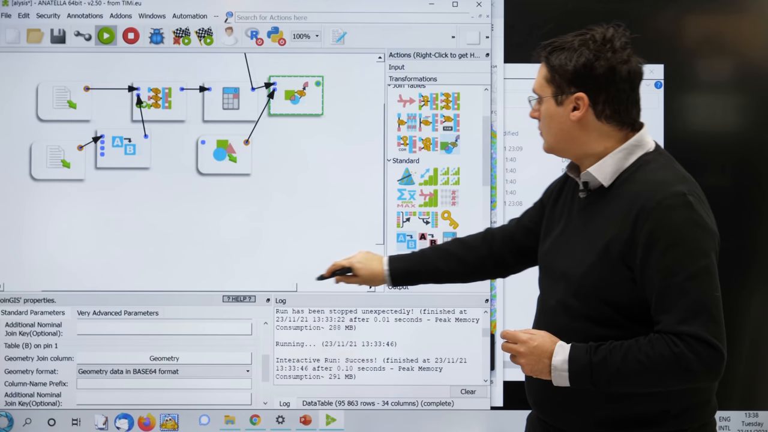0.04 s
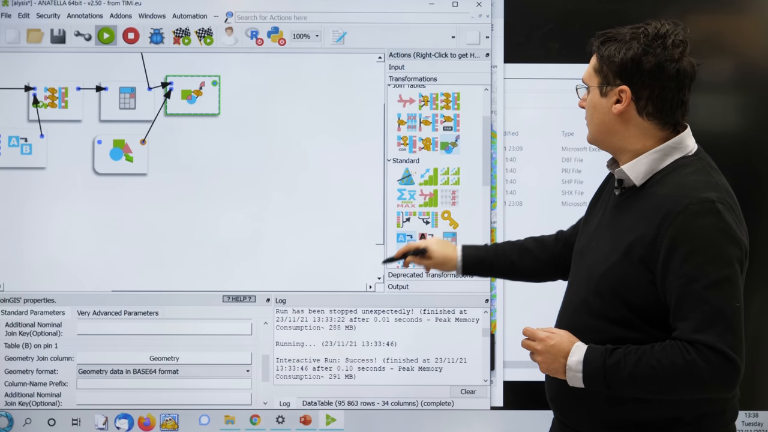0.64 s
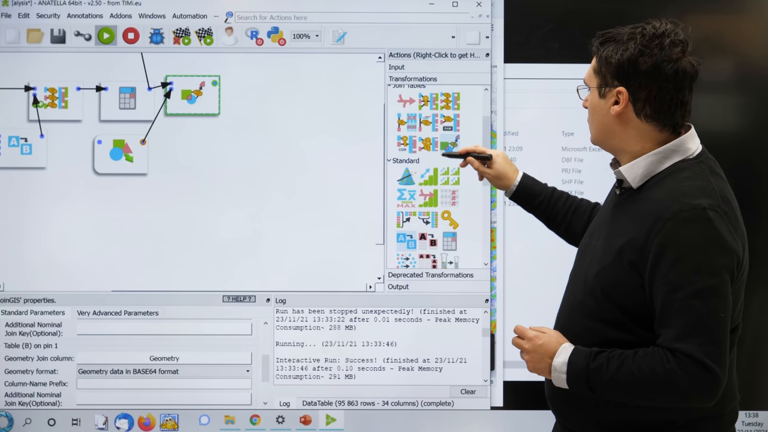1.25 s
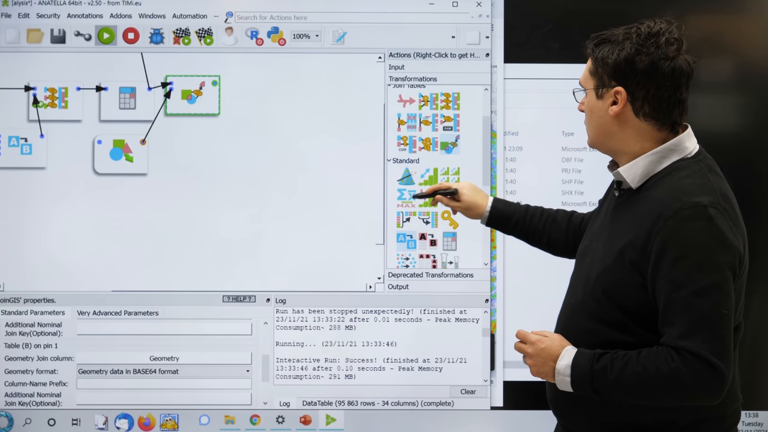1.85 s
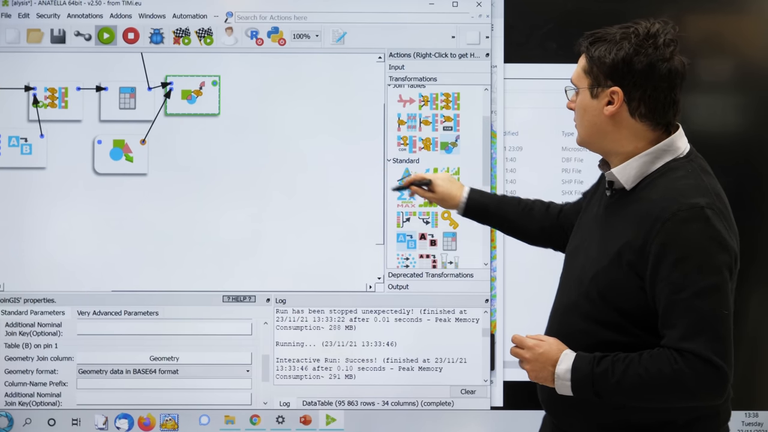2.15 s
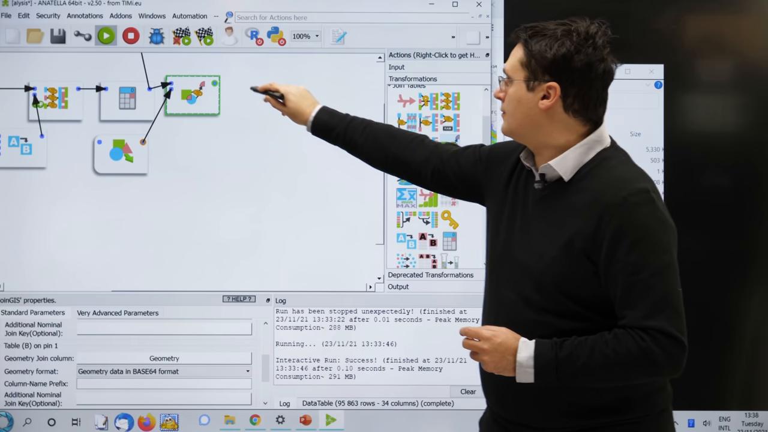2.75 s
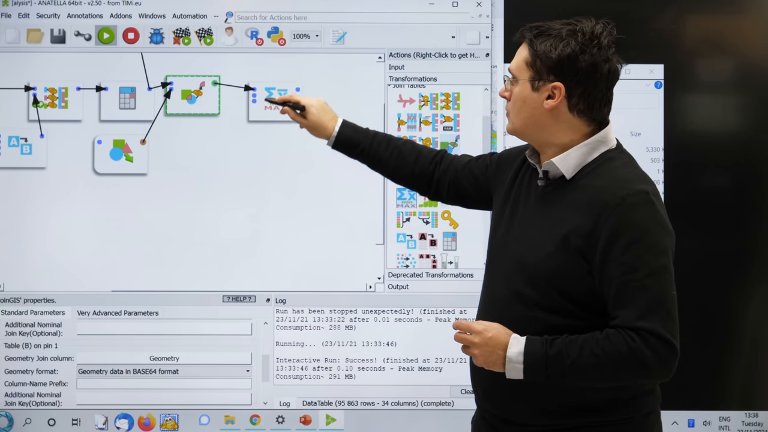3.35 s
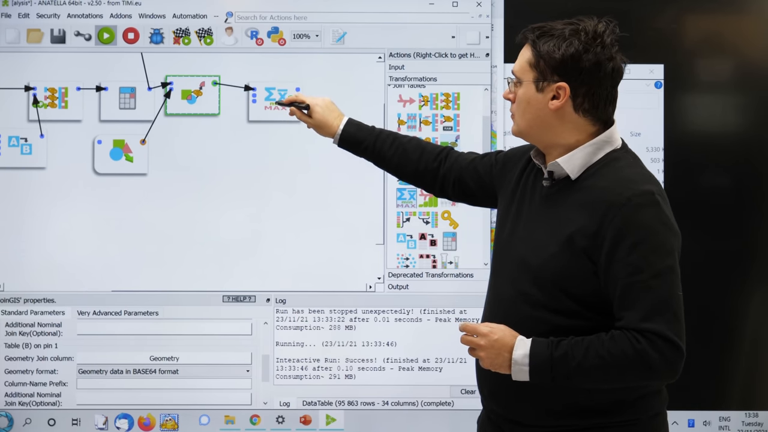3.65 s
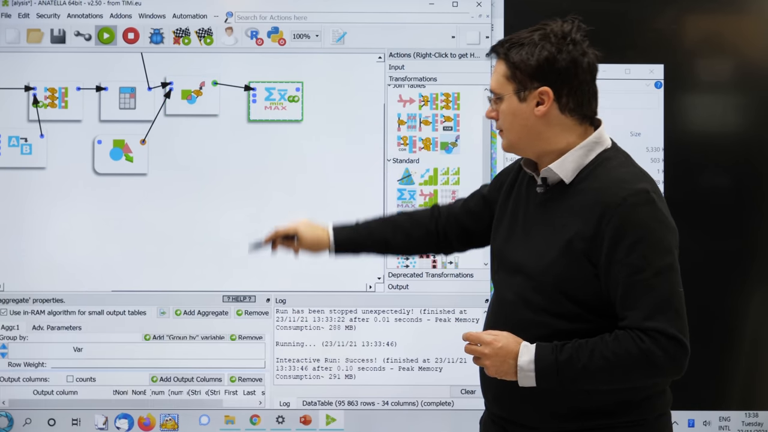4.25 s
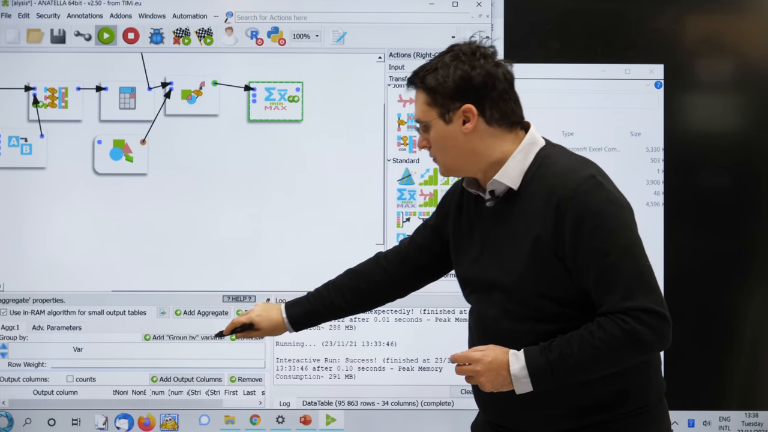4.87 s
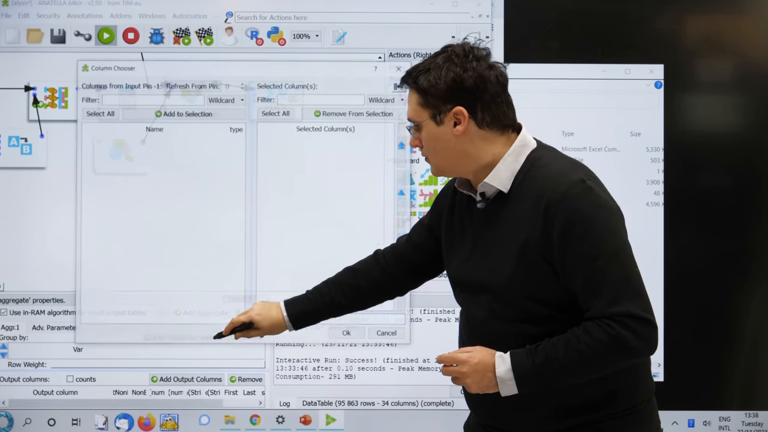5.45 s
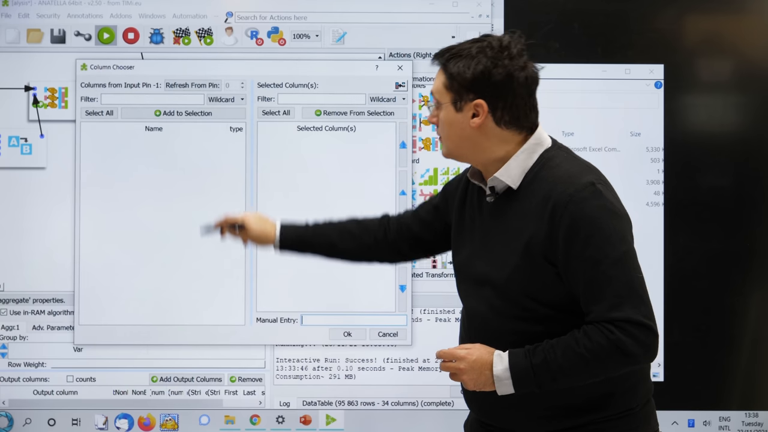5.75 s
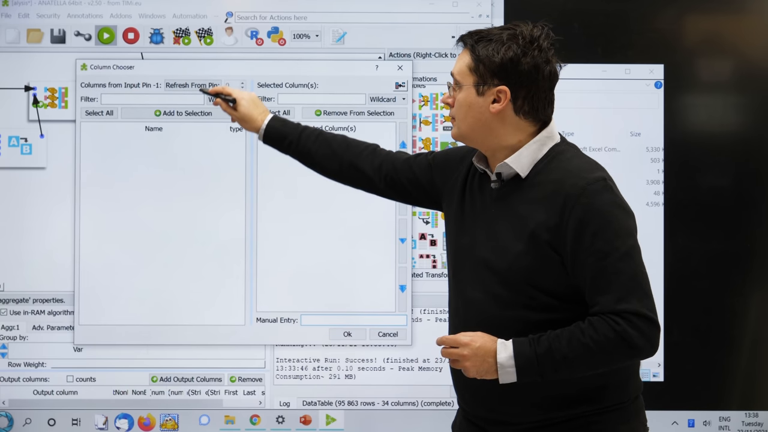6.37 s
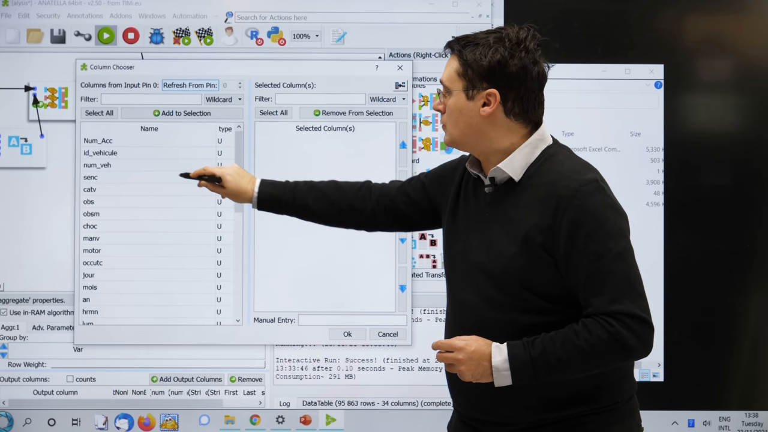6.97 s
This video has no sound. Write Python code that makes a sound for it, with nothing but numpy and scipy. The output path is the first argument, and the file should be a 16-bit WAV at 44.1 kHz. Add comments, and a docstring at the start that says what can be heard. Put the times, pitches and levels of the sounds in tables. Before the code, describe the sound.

Light, irregular stylus taps on a glass display, mixed with faint drags, little clicks and rustling cloth over soft ventilation.

```python
"""A quiet meeting room, where a stylus taps a large touchscreen: single taps and one quick double tap.
Each impact radiates one pressure pulse, then the modes of the glass panel and the room ring on.
Twice the tip is dragged, and sliding friction makes a soft hiss. Small dry clicks fall between the taps;
a sleeve rustles as the arm moves, over soft ventilation noise."""
import sys
import numpy as np
from scipy import signal
from scipy.fft import rfft, irfft
from scipy.io import wavfile

SR = 44100
rng = np.random.default_rng(int(sys.argv[2]) if len(sys.argv) > 2 else 0)


def persist_wave(psi):
    """Save psi, clipped to +-1, as 16-bit WAV."""
    counts = np.round(np.clip(psi, -1, 1) * 32767).astype(np.int16)
    wavfile.write(sys.argv[1], SR, np.atleast_2d(counts).T)


N = 313593
RING_SAMPLES = SR


def from_db(db):
    """Amplitude ratio of a level in decibels."""
    return 10 ** (np.asarray(db) / 20)


def unit_rms(x):
    """Normalisation to an rms of 1."""
    return x / np.sqrt(np.mean(x ** 2) + 1e-20)


def at_hz(points, hz):
    """Interpolation on a log-frequency axis."""
    known_hz, values = np.array(points).T
    return np.interp(np.log(hz), np.log(known_hz), values)


def add(track, start_s, sound):
    """Superposition of a sound on a track."""
    start = round(start_s * SR)
    track[start:start + len(sound)] += sound[:len(track) - start]


def resonance(x, hz, width_hz):
    """A damped two-pole resonator with a peak gain of 1."""
    r = np.exp(-np.pi * width_hz / SR)
    feedback = [1, -2 * r * np.cos(2 * np.pi * hz / SR), r * r]
    return signal.lfilter(np.array([1, 0, -1]) * (1 - r * r) / 2, feedback, x + 1e-18)


def body(x, modes):
    """Parallel resonators, each applied twice to deepen the valleys between them."""
    return sum(from_db(db) * resonance(resonance(x, hz, width), hz, width) for hz, width, db in modes)


def lowpass(x, hz, order=1):
    """Butterworth low-pass filter."""
    return signal.sosfilt(signal.butter(order, hz, fs=SR, output="sos"), x)


def coloured_noise(spectrum):
    """Spectral shaping of white noise, at an rms of 1."""
    hz = np.maximum(np.fft.rfftfreq(N, 1 / SR), 1)
    return unit_rms(irfft(rfft(rng.standard_normal(N)) * from_db(at_hz(spectrum, hz)), N))


def drift(per_s):
    """Random modulation: straight lines join per_s Gaussian values a second."""
    return np.interp(np.arange(N) / SR * per_s, np.arange(N), rng.standard_normal(N))


def friction_gain(strokes, power, lead=0):
    """Friction noise follows a power of speed; lead advances each peak by a share of the rise time."""
    t, gain = np.arange(N) / SR, 0
    for fastest_s, rise_s, fall_s, db in strokes:
        peak_s = fastest_s - lead * rise_s
        progress = np.interp(t, [fastest_s - rise_s, peak_s, fastest_s + fall_s], [0, .5, 1])
        speed = np.abs(np.sin(np.pi * progress))
        gain += from_db(db) * speed ** power
    return gain


# Spectrum of the moving air. Each row: frequency in Hz, relative spectral density in dB.
AIR_SPECTRUM = [(15, -51), (25, -27), (69, -23), (133, -5), (193, -12.5), (684, -19), (762, -22),
                (1080, -20), (1170, -22.5), (1340, -23.5), (1450, -24), (1570, -25.5), (1800, -25),
                (6730, -29), (15500, -35)]

def ventilation(air_db=-66, rumble_db=-73, waver_db=1.0):
    """Steady broadband air noise lies over a low, wavering room resonance."""
    rumble = unit_rms(body(rng.standard_normal(N), [(131.0, 36, 0)]))
    air = from_db(air_db) * coloured_noise(AIR_SPECTRUM)
    return air + from_db(rumble_db + waver_db * drift(per_s=3.6)) * rumble


# Spectrum of rubbing cloth. Each row: frequency in Hz, relative spectral density in dB.
CLOTH_SPECTRUM = [(60, -12), (140, -2), (250, -2.5), (450, -8), (800, -14.5), (2500, -17.5), (7000, -24),
                  (15000, -35.5)]
# Arm movements. Each row: fastest moment, rise time and fall time in seconds, rustle level in dB.
ARM_SWINGS = [(0.1, .3, 0.89, -68.5), (1.15, .15, 0.24, -69), (2.7, 0.65, 0.69, -63),
              (4.3, 0.23, 0.62, -63), (4.88, 0.21, 0.21, -67), (6.08, 0.68, 0.25, -61),
              (6.55, 0.24, 0.44, -68), (7.08, 0.19, .3, -66)]

def sleeve(flutter_db=1.0):
    """Friction of cloth makes a rustle that grows with the speed of the arm."""
    rustle = coloured_noise(CLOTH_SPECTRUM) * friction_gain(ARM_SWINGS, power=0.88)
    return rustle * from_db(flutter_db * drift(per_s=62))


# Low and high resonances of the stylus. Each row: frequency in Hz, bandwidth in Hz, gain in dB.
RUB_MODES = [(990, 640, 1), (2860, 440, 2)]
HISS_MODES = [(4800, 550, -1), (6270, 830, 3), (7950, 710, -0.5), (9600, 940, -1), (11800, 1200, -3),
              (13700, 700, -18)]
# Slides over the glass. Each row: fastest moment, rise time and fall time in seconds, hiss level in dB.
TIP_DRAGS = [(0.2, 0.29, 0.4, -65.5), (2.4, 0.3, 0.57, -63)]

def stylus_drag(rub_db=-3.5, grain_db=1.0):
    """Forced vibration: sliding friction drives each resonance of the stylus with its own noise."""
    def driven(modes):
        return unit_rms(sum(from_db(db) * resonance(rng.standard_normal(N), hz, width)
                            for hz, width, db in modes))

    hiss = driven(HISS_MODES) * friction_gain(TIP_DRAGS, power=0.8)
    # The tip chatters as it gets going, so the rub peaks early.
    rub = driven(RUB_MODES) * friction_gain(TIP_DRAGS, power=0.43, lead=0.32)
    slide = lowpass(hiss + from_db(rub_db) * rub, 14800, order=4)
    return slide * from_db(grain_db * drift(per_s=120))


# Decay of panel and room. Each row: frequency in Hz, time to fall by 60 dB in seconds.
DECAY_TIMES = [(100, 0.88), (200, 0.46), (400, 0.41), (800, 0.33), (3000, 0.3), (12000, 0.24)]

def reverberation(spectrum, build_s):
    """Overlapping modes and echoes merge into noise that builds up and decays; its energy is 1."""
    t, out = np.arange(RING_SAMPLES) / SR, 0
    third_octaves_hz = 50 * 2 ** (np.arange(26) / 3)
    for low, high in zip(third_octaves_hz, third_octaves_hz[1:]):
        hz = np.sqrt(low * high)
        bandpass = signal.butter(2, [low, high], "band", fs=SR, output="sos")
        band = signal.sosfilt(bandpass, rng.standard_normal(2 * RING_SAMPLES))[RING_SAMPLES:]
        envelope = (1 - np.exp(-t / build_s)) * from_db(-60 * t / at_hz(DECAY_TIMES, hz))
        out += unit_rms(band * envelope) * from_db(at_hz(spectrum, hz)) * np.sqrt(high - low)
    return unit_rms(out) / np.sqrt(RING_SAMPLES)


# Hollow and bright resonances of the clicks. Each row: frequency in Hz, bandwidth in Hz, gain in dB.
KNOCK_MODES = [(770, 350, 12), (1490, 560, 7.5), (1866, 150, -4), (2884, 310, 8)]
SNAP_MODES = [(2960, 1500, -2), (5260, 1270, -1.5), (6390, 1750, -0.5), (11000, 2200, -11.5)]
# Dry clicks. Each row: start in seconds, relative level in dB, knock centre in Hz, snap gain in dB,
# swell time in seconds.
DRY_CLICKS = [(0.7196, -54.5, 2840, 3, 0.0051), (0.7275, -52, 1990, 13, 0.00094),
              (0.731, -56.5, 1340, -2, 0.0076), (0.8280, -56, 900, -20, 0.00032),
              (2.0227, -58, 3000, 9, 0.0011), (3.2235, -33.5, 2970, -13, 0.00087),
              (3.7990, -36, 1400, -7, 0.00047), (4.1430, -49.5, 1423, -25, 0.00049),
              (5.0257, -66, 4000, 15.5, 0.00049), (6.5250, -56, 1717, -7, 0.00079),
              (7.0832, -58.5, 1820, -15, 0.0028)]

def small_clicks(room_db=-2.5, gain_db=7.0, knock_width_hz=2600):
    """Transient excitation: short noise bursts drive two sets of resonances, and the room reverberates."""
    out, t = np.zeros(N), np.arange(RING_SAMPLES // 10) / SR
    for start_s, db, centre_hz, snap_db, swell_s in DRY_CLICKS:
        burst = rng.standard_normal(len(t)) * t / swell_s * np.exp(1 - t / swell_s)
        knock = body(resonance(burst, centre_hz, knock_width_hz), KNOCK_MODES)
        snap = from_db(snap_db) * body(burst, SNAP_MODES)
        add(out, start_s, from_db(db + gain_db) * (knock + snap))
    room = reverberation([(100, 0), (16000, 0)], build_s=.006)
    return out + from_db(room_db) * signal.fftconvolve(out, room)[:N]


def pressure_pulse(hz=485, width_hz=500, soft_hz=1360, crack_db=-26.5):
    """Impact radiation: the glass dips and springs back once, and the hard tip adds a fine crack."""
    t = np.arange(RING_SAMPLES) / SR
    push = lowpass(resonance(signal.unit_impulse(RING_SAMPLES), hz, width_hz), soft_hz, order=2)
    push -= lowpass(push, 85)   # a panel radiates little bass
    crack = resonance(rng.standard_normal(RING_SAMPLES), hz=4900, width_hz=4400) * np.exp(-t / 0.0034)
    return -push / np.abs(push).max() + from_db(crack_db) * crack


# Strongest modes of the panel. Each row: frequency in Hz, relative level in dB,
# time to fall by 60 dB in seconds, number of half waves across the glass.
GLASS_MODES = [(111.4, -9, 0.58, 3.8), (143.6, -1.5, 0.69, 0.96), (199.8, 4, 0.48, 1.23),
               (238.4, -7, 0.78, 2.1), (370, 2, 0.55, 2.93), (477.3, 9.5, 0.21, 2.9), (516, 10, 0.21, 2.97),
               (544, 4.5, 0.26, 1.65), (625, -2, 0.23, 0.88), (695, 1, 0.29, 0.81), (706, -4, 0.23, 4.8),
               (778, 0, 0.3, 0.8), (1038, 2, 0.19, 1.9), (1130, -7, 0.24, 0.61), (1193, -11.5, 0.34, 3.3),
               (1346, -9.5, 0.3, 2.3), (2127, -12.5, 0.23, 3.2), (2850, -12, 0.097, 4.3)]

def panel_ring(phases, spot, level_db=-43.5, shape_db=4.0, build_s=0.0021):
    """Modal vibration: each mode is a damped sinusoid whose level depends on where the glass is struck."""
    t = np.arange(RING_SAMPLES) / SR
    hz, db, t60, half_waves = np.array(GLASS_MODES).T[:, :, None]
    struck_db = level_db + db + shape_db * np.cos(np.pi * half_waves * spot)
    modes = from_db(struck_db - 60 * t / t60) * np.sin(2 * np.pi * hz * t + phases[:, None])
    return modes.sum(axis=0) * (1 - np.exp(-t / build_s))


def stylus_ring(level_db=-53.5, t60_s=0.3):
    """Exponential decay: the blow excites the resonances of the stylus, and the room carries them on."""
    t = np.arange(RING_SAMPLES) / SR
    ring = sum(from_db(db) * resonance(rng.standard_normal(RING_SAMPLES), hz, width / 2)
               for hz, width, db in RUB_MODES + HISS_MODES)
    return from_db(level_db - 60 * t / t60_s) * unit_rms(lowpass(ring, 3500))


# Dense ring of panel and room. Each row: frequency in Hz, relative spectral density in dB.
RING_SPECTRUM = [(65, -42), (85, -30), (104, -0.5), (250, -2), (320, -6.5), (470, -3), (680, -8),
                 (1000, -9.5), (1500, -16), (2300, -26.5), (2900, -21), (4000, -41.5), (6300, -33),
                 (14000, -53.5)]
# Impacts on the glass. Each row: start in seconds, relative force in dB, pulse gain in dB,
# treble gain in dB, spot on the glass from 0 to 1.
IMPACTS = [(2.007, -16, -12, 9, 0.5), (2.0167, -8, -2, 1.5, 0.82), (2.0191, -11, 4, -3, 0.38),
           (2.029, -6, -15, -8, 0.5), (3.6714, 1.5, -1.5, 0, 0.19), (3.8534, 0.5, -1, 1, 0.18),
           (5.1816, -3, -2, -0.5, 0.53), (6.3283, -1, -3.5, 5, 0.83), (6.3318, -11, 10, -20, 0.3),
           (6.3397, -16, 6.5, 10, 0.69)]

def stylus_taps(pulse_db=-18, ring_db=-4, treble_hz=1700):
    """Superposition of modes: the spot struck sets their blend, so taps on one spot sound alike."""
    out = np.zeros(N)
    slow_ring = reverberation(RING_SPECTRUM, build_s=0.0044)
    fast_ring = reverberation(RING_SPECTRUM, build_s=0.0011)
    phases, phase_slopes = rng.uniform(0, 2 * np.pi, (2, len(GLASS_MODES)))
    for start_s, force_db, pulse_gain_db, treble_db, spot in IMPACTS:
        tap = from_db(ring_db) * (np.cos(np.pi * spot) * slow_ring + np.sin(np.pi * spot) * fast_ring)
        tap += panel_ring(phases + spot * phase_slopes, spot)
        tap += from_db(pulse_db + pulse_gain_db) * pressure_pulse()
        tap += stylus_ring()
        dull = lowpass(tap, treble_hz)
        treble = from_db(treble_db) * (tap - dull)   # a harder contact is brighter
        add(out, start_s, from_db(force_db) * (dull + treble))
    return out


def scene(air_width_db=-26):
    """Mid-side stereo: all sources lie straight ahead, and only the ventilation has a trace of width."""
    mid = stylus_taps() + stylus_drag() + small_clicks() + sleeve() + ventilation()
    side = from_db(air_width_db) * ventilation()
    return np.array([mid + side, mid - side])


def record(dry):
    """Band limiting: the microphone drops the deep bass, and the highest treble is cut."""
    low_hz, high_hz = 55, 15700
    thin = signal.sosfilt(signal.butter(3, low_hz, "high", fs=SR, output="sos"), dry)
    return signal.sosfilt(signal.ellip(10, .1, 70, high_hz, fs=SR, output="sos"), thin)


dry = scene()
out = record(dry)
persist_wave(out)
```